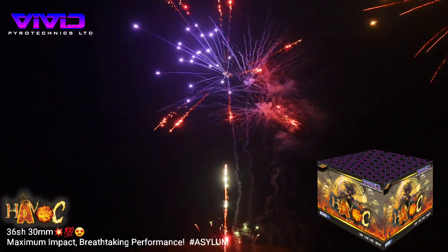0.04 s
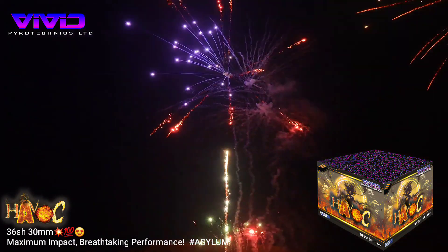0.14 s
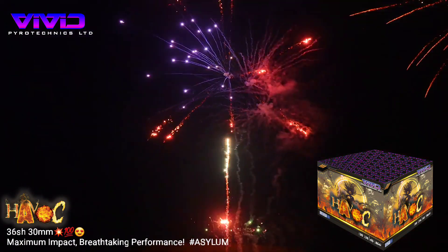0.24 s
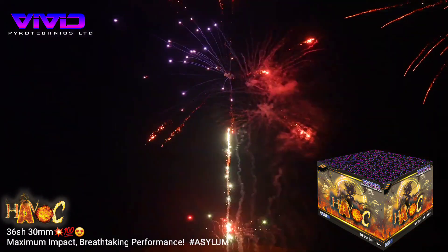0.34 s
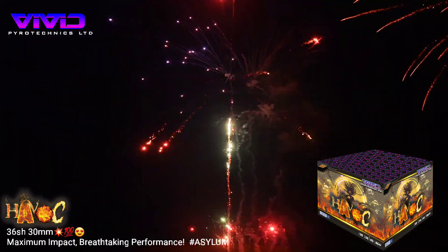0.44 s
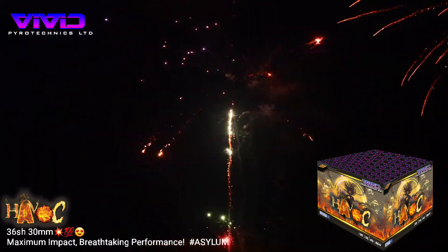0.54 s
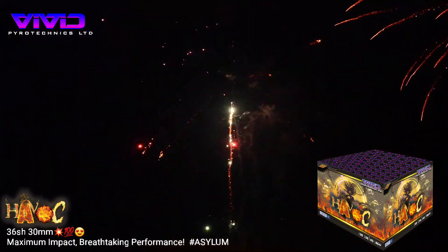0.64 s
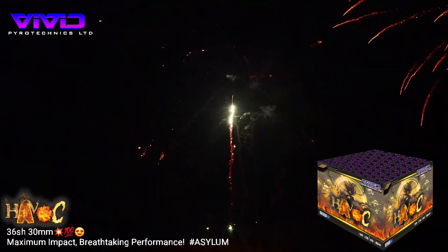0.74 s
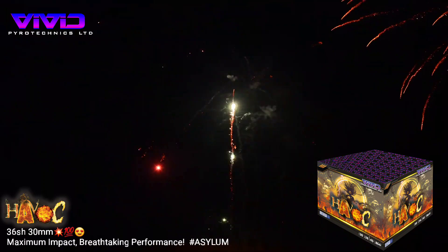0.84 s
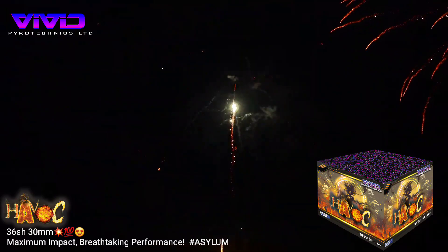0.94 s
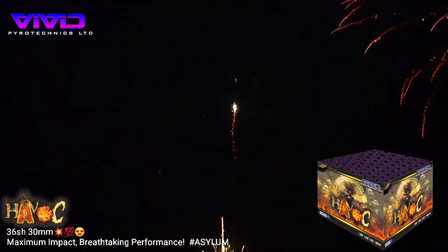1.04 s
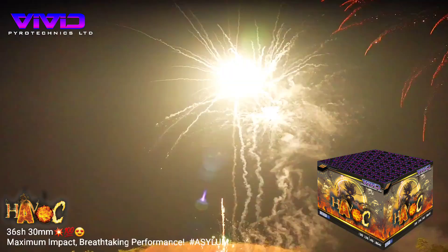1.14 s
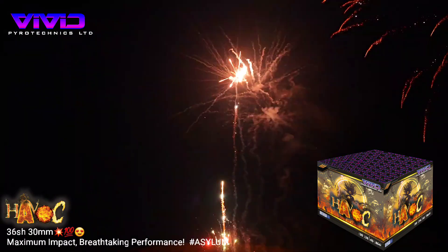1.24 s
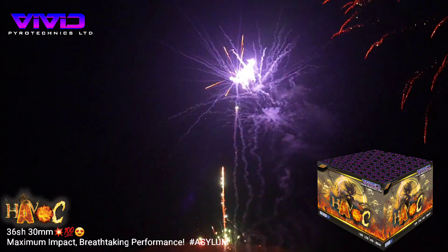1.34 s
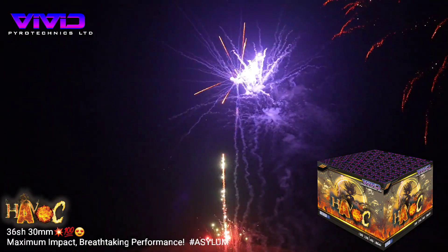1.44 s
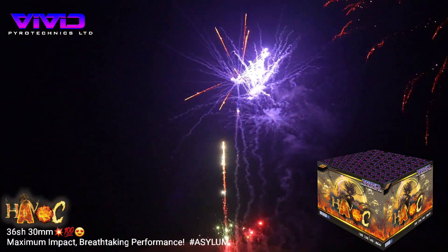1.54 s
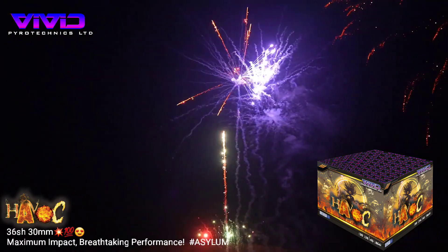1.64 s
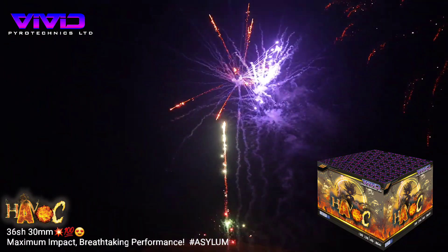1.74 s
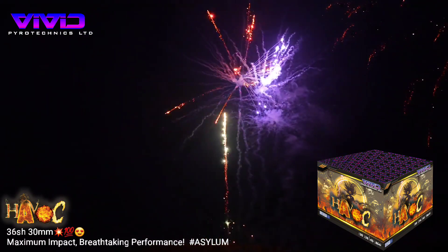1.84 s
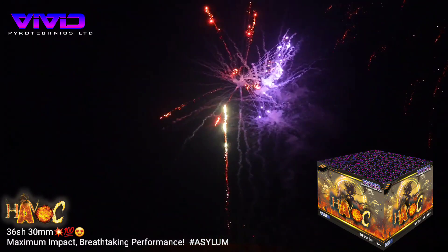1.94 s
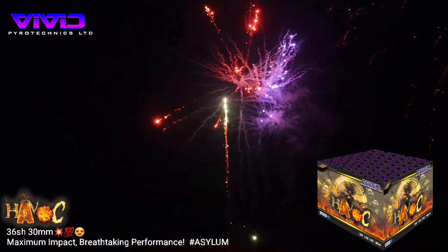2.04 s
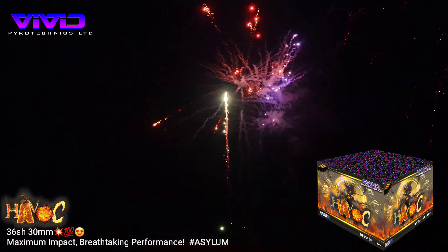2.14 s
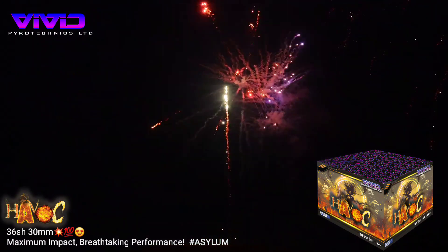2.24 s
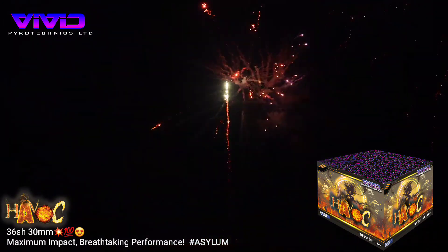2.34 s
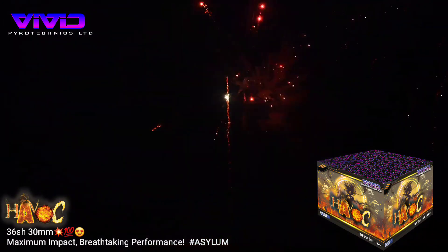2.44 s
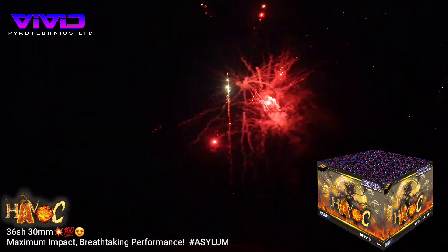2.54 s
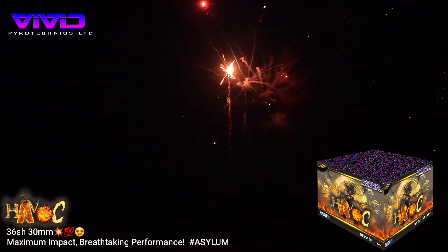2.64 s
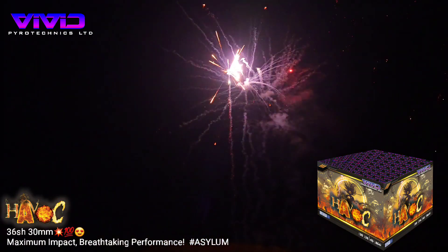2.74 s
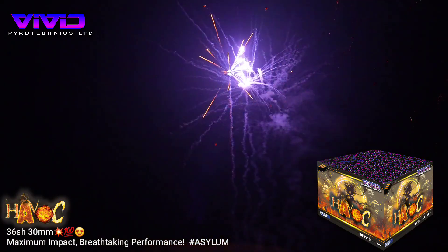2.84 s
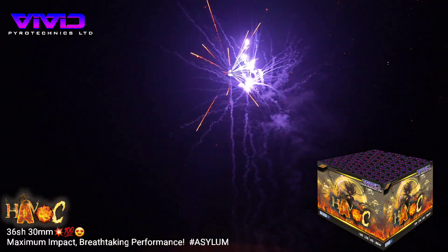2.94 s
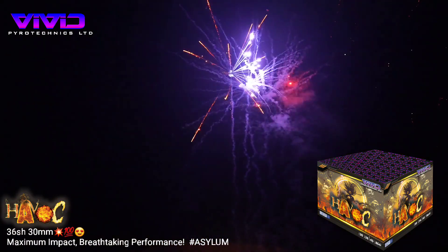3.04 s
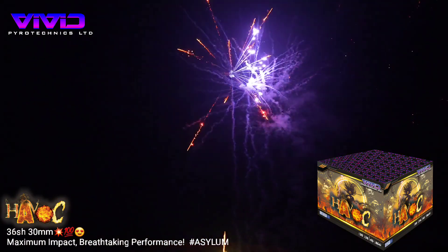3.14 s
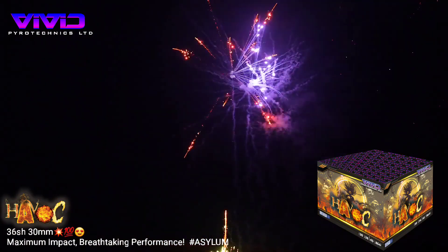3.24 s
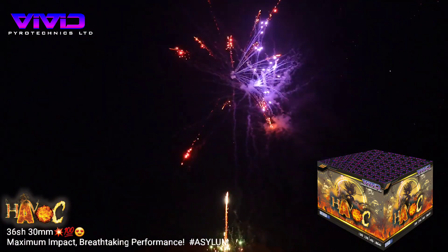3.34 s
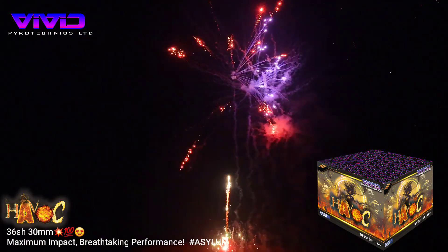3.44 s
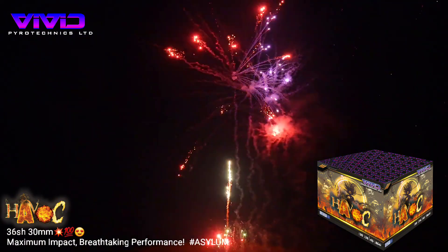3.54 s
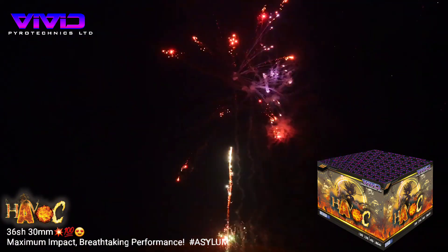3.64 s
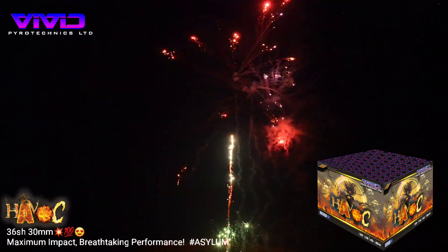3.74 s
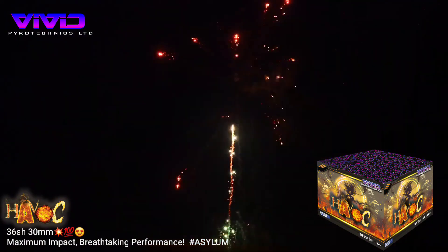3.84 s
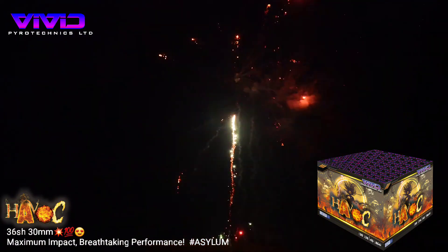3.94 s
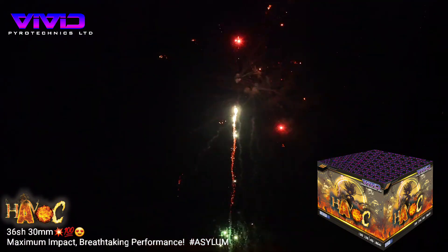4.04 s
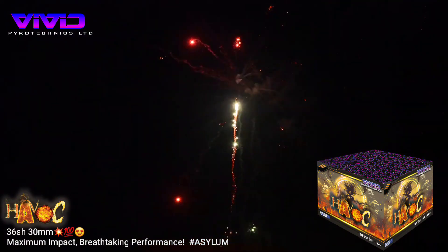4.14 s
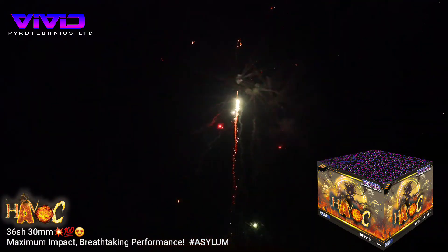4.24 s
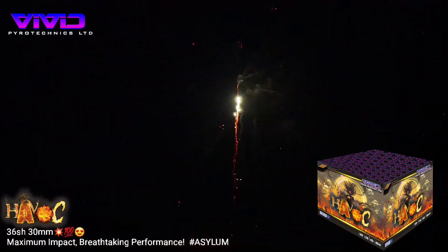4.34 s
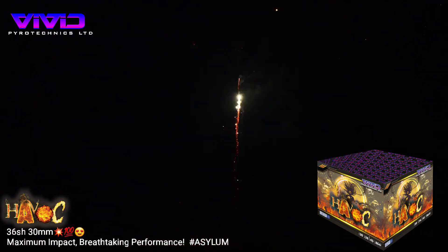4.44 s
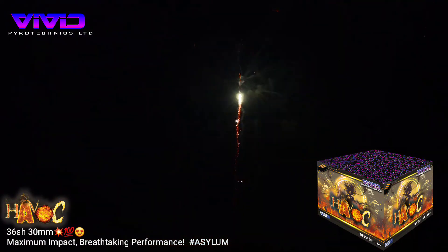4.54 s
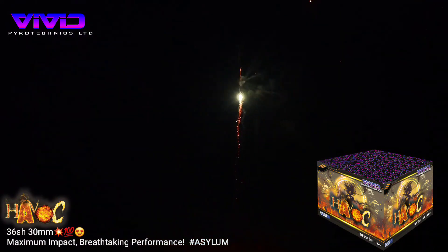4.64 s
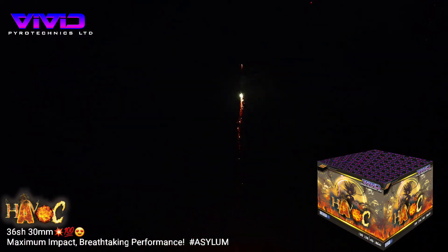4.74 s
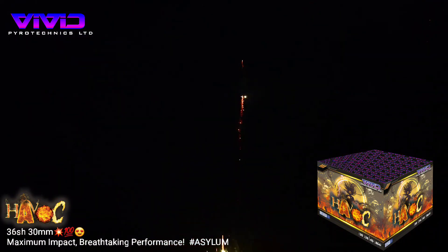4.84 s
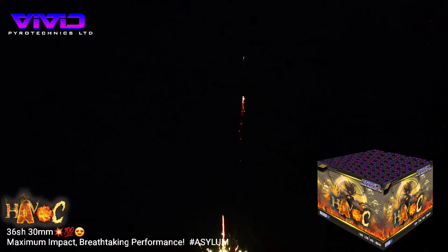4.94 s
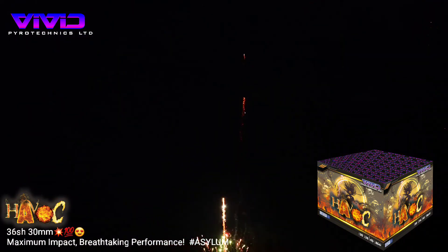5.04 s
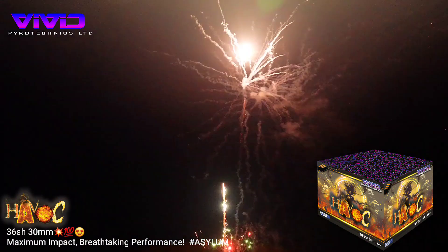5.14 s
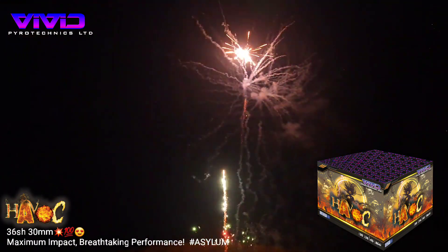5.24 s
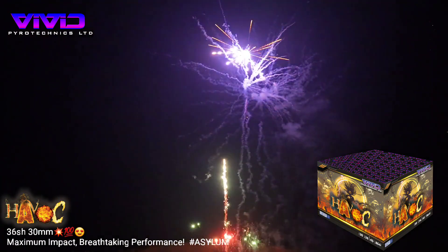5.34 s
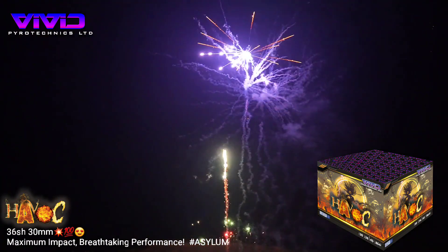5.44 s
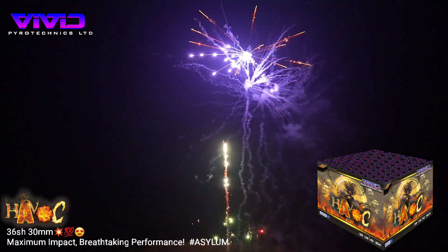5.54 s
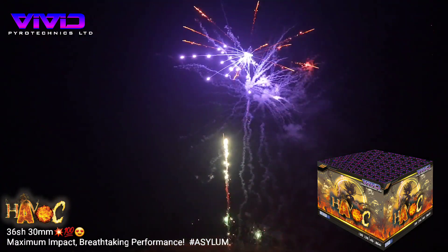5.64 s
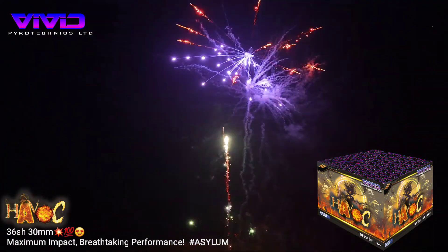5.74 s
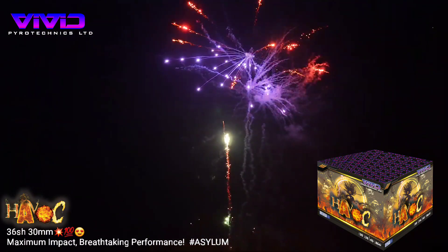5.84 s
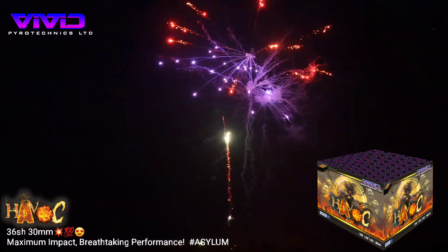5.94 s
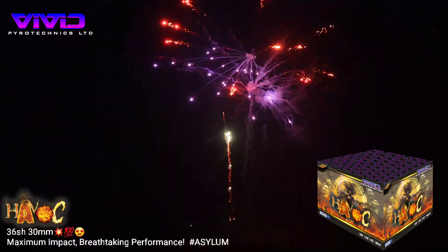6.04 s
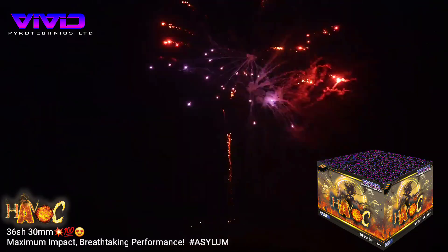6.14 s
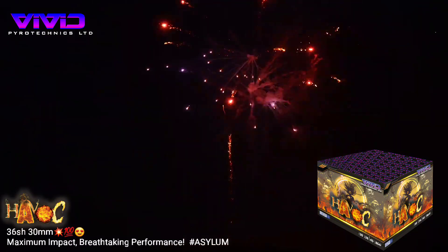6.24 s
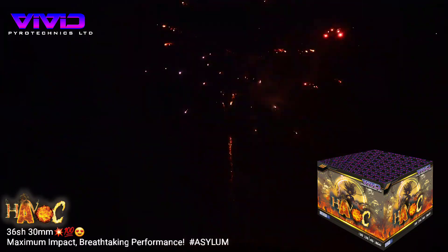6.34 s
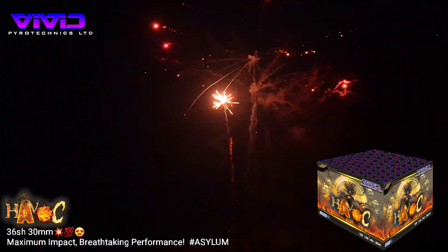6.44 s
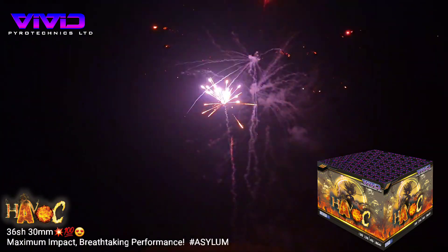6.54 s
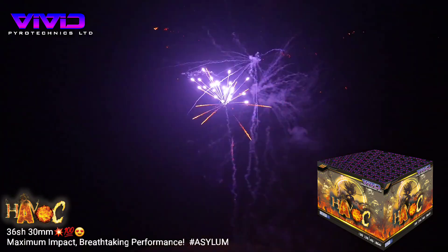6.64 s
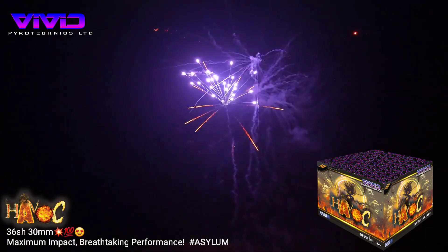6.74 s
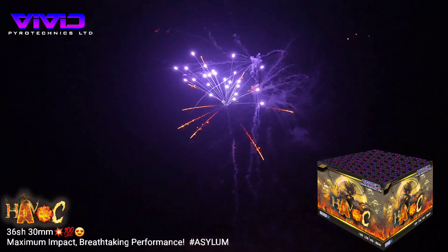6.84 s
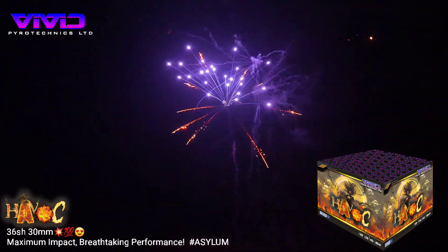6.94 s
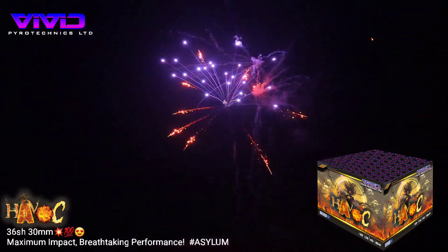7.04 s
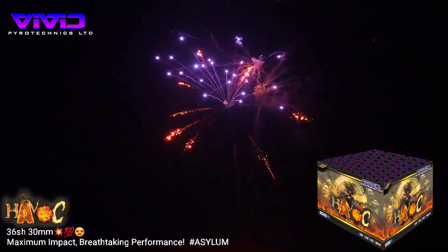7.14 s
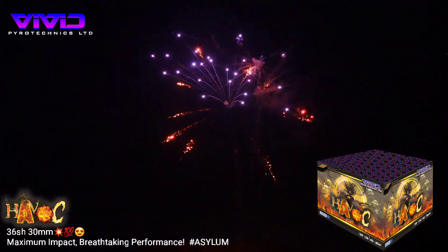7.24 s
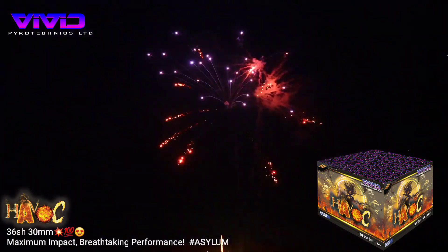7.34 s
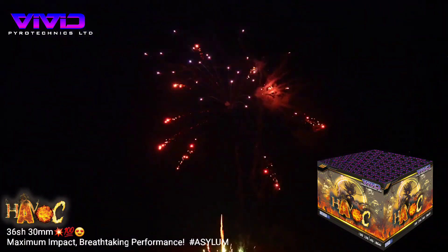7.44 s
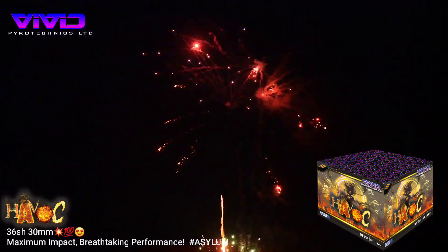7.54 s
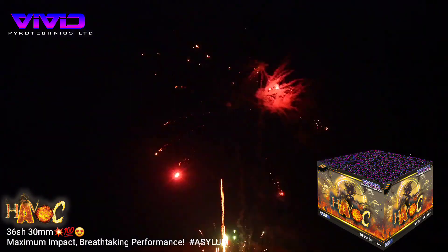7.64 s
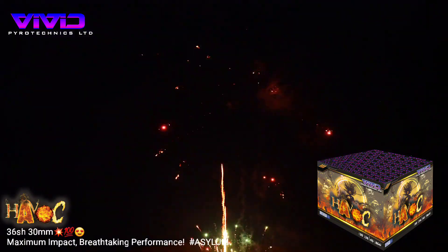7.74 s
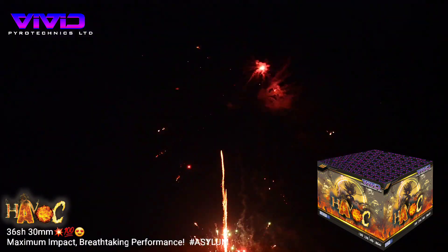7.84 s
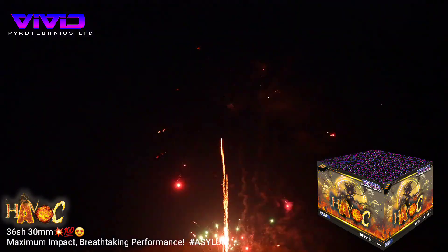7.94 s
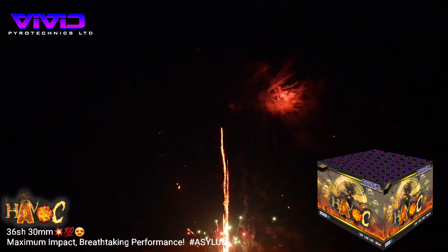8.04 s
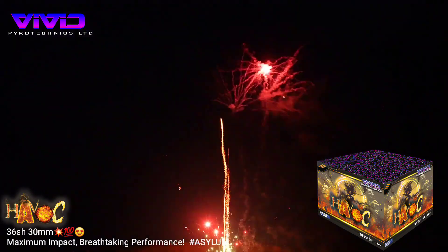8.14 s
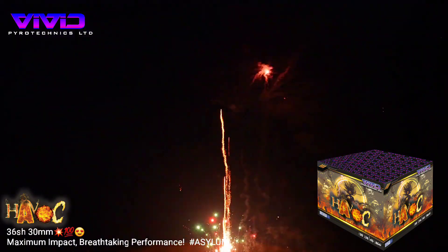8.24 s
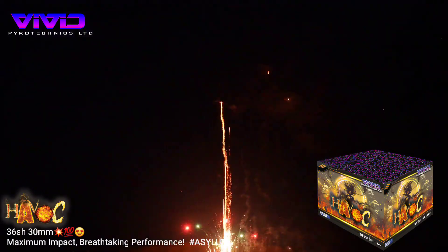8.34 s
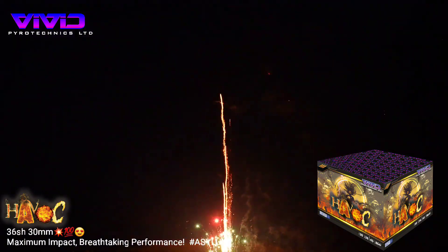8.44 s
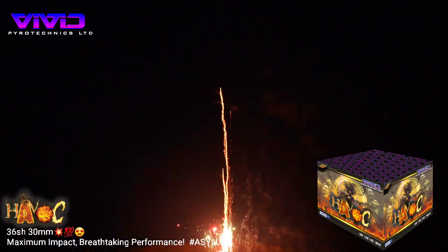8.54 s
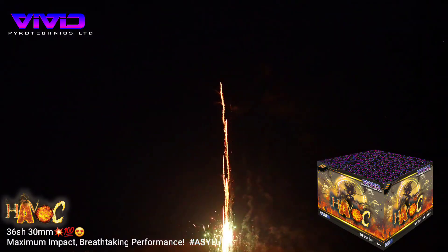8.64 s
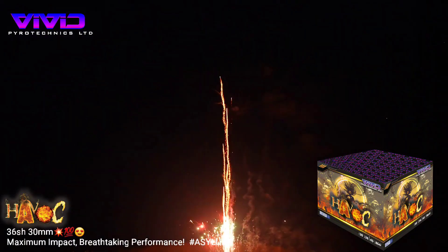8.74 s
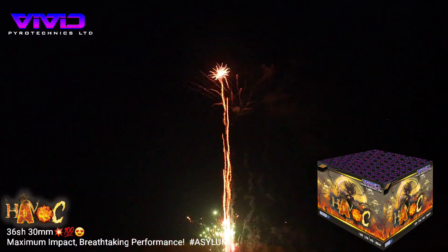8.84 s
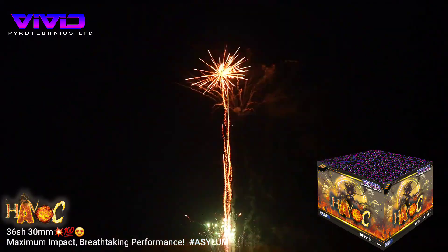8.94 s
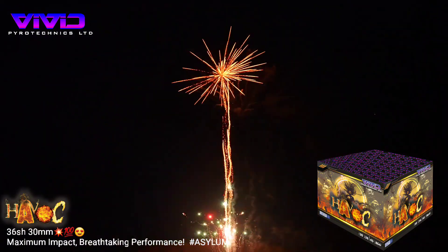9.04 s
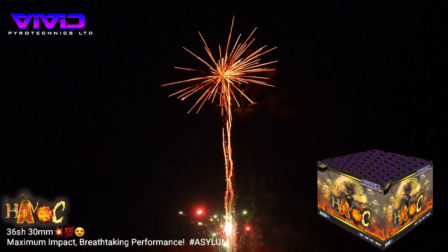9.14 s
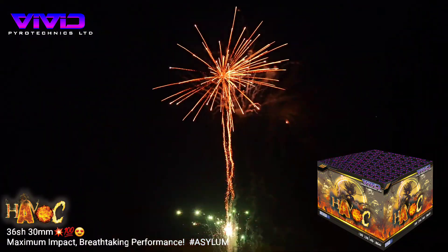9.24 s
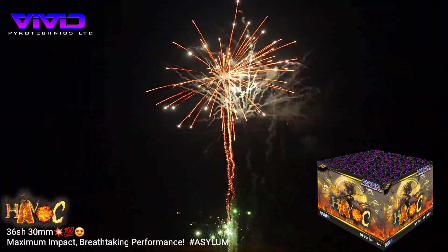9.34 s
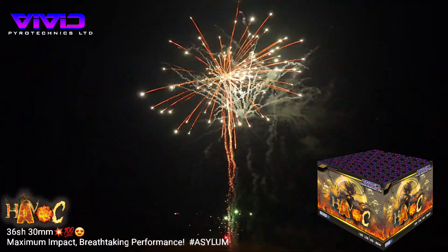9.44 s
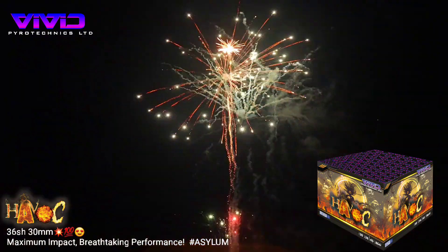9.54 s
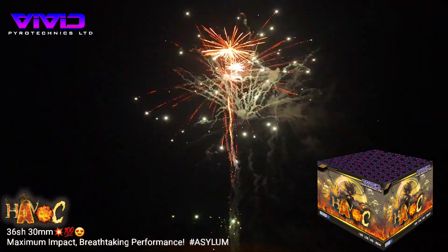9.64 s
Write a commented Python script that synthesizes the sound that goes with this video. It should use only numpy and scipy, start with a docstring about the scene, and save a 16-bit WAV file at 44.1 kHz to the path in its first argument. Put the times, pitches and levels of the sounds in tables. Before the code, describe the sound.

Echoes of an earlier burst die away, then single hollow launch thumps alternate with much louder sharp aerial bangs, with quiet gaps between them. Every bang returns as a hard slap, leafy scatter and distant rumble. Near the end launches come in a quickening volley before one more crack. Faint fizz and night hiss sit beneath; heard at a distance outdoors in wide stereo.

```python
"""Firework cake in an open field at night

Lift charges thump out of their tubes and shells burst overhead: minimum-phase shocks with close reflections.
Shaped noise returns them as a rushing scatter from the trees and a long far roll; buildings answer with
hard rattling slaps made of many shock copies. Faint dull pops, fizzes and steady night noise lie beneath."""
import sys
import numpy as np
from scipy import signal
from scipy.fft import rfft, irfft, next_fast_len
from scipy.io import wavfile

SR = 44100
rng = np.random.default_rng(int(sys.argv[2]) if len(sys.argv) > 2 else 0)


def log_audio(samples):
    """Write samples as a 16-bit WAV file to the path given in sys.argv[1]."""
    # one column per channel
    frames = np.atleast_2d(samples).T
    # limit to full scale, then quantise
    limited = np.clip(frames, -1, 1)
    pcm = np.round(limited * 32767).astype(np.int16)
    wavfile.write(sys.argv[1], SR, pcm)


N = 427329

# shell bursts: t/s, shock/dB, ground echo lag/ms, near slap lag/s, near slap length/s,
# level of near slap and rush/dB, level of roll and stray echoes/dB,
# bass of near slap, rush, roll and stray echoes/dB
BURST_SHOTS = [(-.139, 0, 4, 0.19, .098, -5, 5, 4), (1.5617, 6, 4.1, 0.17, 0.039, .5, 1, -3),
               (3.0053, 3, 4.07, 0.17, 0.038, 0, 1.5, -3), (5.548, 4, 4.6, .175, 0.038, 0, 1.5, -2),
               (6.7868, 6, 3.66, .154, .039, 1, 1, -1.5), (9.224, 5.5, 4.2, 0.17, 0.034, -0.5, 0.5, -1)]
# a shock and its reflections close to the listener: nominal lag/ms, mean level/dB, treble edge/Hz
CLOSE_PULSES = [(0, 0, 16000), (1.1, -11, 12000), (2.05, -7, 2200)]
# spectrum of a lift shock: f/Hz, relative level/dB
LIFT_COLOUR = [(30, -49), (70, -25), (130, -8), (220, 0.5), (500, -2.5), (800, -2.5), (1200, 1.5),
               (2300, -4), (3500, -11), (6000, -15), (10000, -16.5), (16000, -28)]

LIFT_DB, BURST_DB = 6.5, 1.5
SLAP_DB = 18.5  # common level of all building echoes
SHOCK_SIZE = 8192  # samples
HALF_SHOCK_S = SHOCK_SIZE / 2 / SR
BIN_HZ = np.arange(SHOCK_SIZE // 2 + 1) * SR / SHOCK_SIZE


def from_db(db):
    """Decibels to amplitude gain."""
    return 10 ** (np.asarray(db) / 20)


def at_hz(points, hz):
    """Reads a (Hz, value) table on a log-frequency axis."""
    points = np.array(points)
    return np.interp(np.log(np.maximum(hz, 1)), np.log(points[:, 0]), points[:, 1])


def add(out, s, sound):
    """Mixes a sound into out from time s on, clipped to the scene's ends."""
    start = round(s * SR)
    a, b = max(start, 0), min(start + sound.shape[-1], N)
    if b > a:
        out[:, a:b] += sound[..., a - start:b - start]


def panned(pan_db):
    """Left and right gains for a left-over-right level difference."""
    return from_db(np.array([[.5], [-.5]]) * pan_db)


def lowpassed(x, order, edge_hz):
    """Butterworth low-pass."""
    return signal.sosfilt(signal.butter(order, edge_hz, fs=SR, output="sos"), x)


def with_bass(x, db, edge_hz=220):
    """A bigger shell booms more: a low shelf."""
    return x + (from_db(db) - 1) * lowpassed(x, 1, edge_hz)


def dulled(x, edge_hz):
    """A long path through the air takes the treble away."""
    return lowpassed(x, 2, edge_hz)


def shock(colour, crack_db=0, crack_hz=3000):
    """Spectrum of a sudden-fronted pressure pulse (minimum phase); unit energy before the crack's treble shelf."""
    gain = from_db(at_hz(colour, BIN_HZ))
    gain = gain / np.sqrt(np.mean(gain ** 2))
    treble_share = BIN_HZ ** 2 / (BIN_HZ ** 2 + crack_hz ** 2)
    gain = gain * from_db(crack_db * treble_share)
    # folded real cepstrum gives minimum phase
    cepstrum = irfft(np.log(gain))[:SHOCK_SIZE // 2]
    cepstrum[1:] *= 2
    return np.exp(rfft(cepstrum, SHOCK_SIZE))


def report(pulse, arrivals):
    """A shock with its duller pulses, before or after it, skewed slightly between the ears; centred in its buffer."""
    out = 0
    for lag_ms, db, dull_hz in arrivals:
        common_ms = lag_ms * (1 + .022 * rng.normal())
        ear_ms = common_ms + .03 * np.tanh(lag_ms) * rng.normal(size=(2, 1))
        delay = np.exp(-2j * np.pi * BIN_HZ * ear_ms / 1000)
        out = out + from_db(db + rng.normal()) * delay / (1 + 1j * BIN_HZ / dull_hz)
    # all-pass: the bass lags behind the front, so a deep suction follows the first spike
    lagging = (1j * BIN_HZ - 550) / (1j * BIN_HZ + 550)
    return np.roll(irfft(out * pulse * lagging), SHOCK_SIZE // 2, axis=-1)


def slap(length_s, per_s, skew_ms=0.045, uneven_db=4):
    """Wall facets, large and small, each return a copy of the shock, weaker when later; unit energy."""
    # spectrum of a wall echo: f/Hz, relative level/dB
    wall_colour = [(30, -38.5), (70, -18), (130, -5), (260, -3.5), (520, 1.5), (750, -5), (1100, -0.5),
                   (2400, 0), (3600, -6), (6000, -12), (10000, -24.5), (16000, -40)]
    count = max(int(length_s * per_s), 2)
    place = (np.arange(count) + rng.random(count)) / count
    polarity = rng.choice([-1, 1], count)
    chance = rng.normal(size=count).clip(-2, 2)
    size = polarity * np.sqrt(1 - place ** 2) * from_db(uneven_db * chance)
    skew_s = rng.normal(0, abs(skew_ms), count) / 1000
    clicks = np.zeros((2, SHOCK_SIZE))
    for ear, sign in zip(clicks, (1, -1)):
        index = np.clip((place * length_s + sign * skew_s / 2) * SR, 0, SHOCK_SIZE - 1).astype(int)
        np.add.at(ear, index, size)
    return signal.fftconvolve(clicks / np.linalg.norm(size), irfft(shock(wall_colour))[None], axes=1)


def noise(colour, size, grain_db=0):
    """Countless tiny arrivals of uneven size, alike in both ears in the bass only; mid rms 1."""
    # stereo width: f/Hz, side over mid/dB
    side_width = [(60, -34), (110, -58.5), (200, -54), (380, -13.5), (700, -7), (1290, -3), (2380, 2),
                  (4400, 0), (8120, 0), (15000, -1)]
    hz = np.arange(size // 2 + 1) * SR / size
    grains = from_db(grain_db * np.repeat(rng.normal(size=size // 32 + 1), 32)[:size])
    mid, side = rfft(rng.normal(size=(2, size)) * grains) * from_db(at_hz(colour, hz))
    mid = irfft(mid, size)
    side = irfft(side * from_db(at_hz(side_width, hz)), size)
    return np.array([mid + side, mid - side]) / mid.std()


def scatter(gain_at, colour, grain_db, bright_s, air_db, early_db, swell_db, size):
    """Echoes of one shot from all around: early_db dulls the first off the grass, air_db (per s) the later ones."""
    age = np.arange(size) / SR
    field = rfft(noise(colour, size, grain_db))
    hz = np.linspace(0, SR / 2, field.shape[1])
    centres_hz = [500, 1500, 3000, 6000, 10000, 15000]
    # loss at the top centre; lower bands lose in proportion to frequency
    treble_loss_db = air_db * (age - bright_s) + early_db * np.clip(1 - age / bright_s, 0, 1) ** 2
    lumps = np.interp(age, np.arange(200) / 70, rng.normal(size=200))
    out = 0
    for centre, share in zip(centres_hz, np.eye(len(centres_hz))):
        # big reflectors come in lumps and return the low notes; leaves return an even hiss
        lump_db = swell_db * lumps * min(1, centres_hz[1] / centre)
        db = lump_db - treble_loss_db * centre / centres_hz[-1]
        out = out + irfft(field * np.interp(hz, centres_hz, share)) * from_db(db)
    return out * gain_at(age)


def belt(age, db, near_s, far_s, rise_db_per_s, thin_db_per_s, fade_db_per_s, near_pan_db, far_pan_db):
    """Stereo echo gain of a belt of country: builds to its near edge, thins across it, dies past its far edge."""
    inside = np.clip(age, near_s, far_s)
    rise_db = rise_db_per_s * np.maximum(near_s - age, 0)
    thin_db = thin_db_per_s * (inside - near_s)
    fade_db = fade_db_per_s * np.maximum(age - far_s, 0)
    pan_db = np.interp(age, [near_s, far_s], [near_pan_db, far_pan_db])
    return from_db(db - (rise_db + thin_db + fade_db)) * panned(pan_db)


def close_by(age, db, fade_db_per_s, pan_db):
    """Stereo gain of the brief splash off the ground around the listener."""
    return from_db(db - fade_db_per_s * age) * panned(pan_db)


def smeared_echo(lag_s, spread_s, hz, width_hz, size):
    """One band of a shot, smeared by foliage into a soft swell; noise of rms 1 under a Gaussian of peak 1."""
    edges = hz * np.exp(np.array([-.5, .5]) * width_hz / hz)
    band = signal.sosfilt(signal.butter(2, edges, "band", fs=SR, output="sos"), rng.normal(size=size))
    swell = np.exp(-.5 * ((np.arange(size) / SR - lag_s) / spread_s) ** 2)
    return band / band.std() * swell


def lifts():
    """Each lift charge leaves its tube as a hollow knock; all start from one spot, so their echoes are half alike."""
    # lift charges: t/s, shock/dB, crack/dB, bass/dB, ring of the tube f/Hz, scatter/dB
    lift_shots = [(1.051, 0, -5.5, 1.5, 1080, 0.5), (3.224, 0.5, -4, 1, 1070, -3),
                  (4.9403, -0.5, -10.5, -4, 1080, -1.5), (7.4457, 0, 5, 4, 1000, 2),
                  (7.6925, 0, 4.5, 4, 1040, -0.5), (8.0316, 2, -3.5, -2.5, 1100, -1),
                  (8.2532, 1.5, 0, 0, 1370, -1), (8.434, 0, 5, 1.5, 1460, -.5),
                  (8.6294, 0, 2, -1, 1410, -0.5)]
    # pulses that make up one lift: nominal lag/ms, mean level/dB, treble edge/Hz
    knock_pulses = [(-3.0, -18, 1200), (0, 0, 16000), (.84, -10, 2500), (1.72, -5, 2200), (2.82, -12, 1800),
                    (3.58, -7.5, 1600)]
    ring_db, ring_q = -4.5, 5  # the mortar tube's ring
    out, common = np.zeros((2, N)), lift_echoes()
    for s, db, crack_db, bass_db, ring_hz, scatter_db in lift_shots:
        knock = report(shock(LIFT_COLOUR, crack_db), knock_pulses)
        ring = signal.lfilter(*signal.iirpeak(ring_hz, ring_q, fs=SR), knock)
        knock = knock + from_db(ring_db) * ring
        add(out, s - HALF_SHOCK_S, from_db(LIFT_DB + db) * with_bass(knock, bass_db))
        echoes = (common + lift_echoes()) / np.sqrt(2)
        add(out, s, from_db(scatter_db) * with_bass(echoes, bass_db))
    return out


def lift_echoes(size=49152):
    """The field's answer: a wash from trees, the knock's notes from hedges, a brighter swell from treetops."""
    # spectrum of the wash: f/Hz, relative level/dB
    wash_colour = [(24, -63.5), (40, -34.5), (185, -12.5), (262, -10.5), (412, -17), (444, -10),
                   (503, -7.5), (585, -8.5), (1020, -6), (1440, -8), (1550, -11), (5870, -14),
                   (9940, -19.5), (14500, -29), (16000, -44)]
    # hedges that answer every lift: lag/s, level/dB
    hedges = [(0.032, -33), (0.055, -34.5), (.085, -44.5), (.116, -36.5)]
    # notes of the knock that the hedges return: f/Hz, width/Hz, level/dB, loss/(dB per s of lag)
    knock_notes = [(536, 240, 3.5, 119), (1180, 480, -1, 0)]
    hedge_spread, hedge_pan_db = 0.15, 3  # smear as a share of the lag; left over right
    out = scatter(lift_gain, wash_colour, grain_db=1.5, bright_s=0.058, air_db=27.5, early_db=59,
                  swell_db=1.5, size=size)
    for lag_s, db in hedges:
        for hz, width_hz, note_db, loss_db_per_s in knock_notes:
            echo = smeared_echo(lag_s, hedge_spread * lag_s, hz, width_hz, size)
            out = out + from_db(db + note_db - loss_db_per_s * lag_s) * panned(hedge_pan_db) * echo
    treetops = smeared_echo(lag_s=0.17, spread_s=0.032, hz=2030, width_hz=1320, size=size)
    return out + from_db(-37.5) * panned(pan_db=-2.5) * treetops


def lift_gain(age):
    """A lift splashes off the ground, sweeps through the trees and returns faintly from the country beyond."""
    trees = belt(age, db=-34.0, near_s=0.075, far_s=0.2, rise_db_per_s=110, thin_db_per_s=47.5,
                 fade_db_per_s=88, near_pan_db=1, far_pan_db=-1.0)
    country = belt(age, db=-52.5, near_s=0.6, far_s=0.59, rise_db_per_s=38, thin_db_per_s=9,
                   fade_db_per_s=40, near_pan_db=-2, far_pan_db=-2)
    splash = close_by(age, db=-29, fade_db_per_s=999, pan_db=-9)
    return np.hypot(np.hypot(trees, country), splash)


def bursts(ground_db=-5, ground_hz=7000, facets_per_s=5000):
    """Each shell cracks overhead, bounces off the ground, then slaps back from near and far buildings."""
    # spectrum of a burst shock: f/Hz, relative level/dB
    burst_colour = [(30, -42.5), (70, -29.5), (130, -6.5), (260, 1.5), (500, 2), (1000, 4), (2000, -2),
                    (3300, -9), (6000, -9.5), (10000, -15.5), (16000, -23)]
    # other echoes of every burst, one very close, then far ones: lag/s, length/s, level/dB, facet rate/(1/s)
    other_slaps = [(.037, .014, -15, 1000), (0.521, .07, -24, 200), (0.562, 0.016, -19.5, 600),
                   (.62, 0.021, -27, 240), (0.774, .014, -22.5, 600), (0.893, 0.064, -33, 120)]
    near_slap_db = -4.5
    late_edge_hz = 790  # treble edge of an echo one second late; falls with the root of the lag
    out = np.zeros((2, N))
    for s, db, ground_ms, slap_lag_s, slap_length_s, near_db, _, bass_db in BURST_SHOTS:
        arrivals = [*CLOSE_PULSES, (ground_ms, ground_db, ground_hz)]
        crack = report(shock(burst_colour), arrivals)
        add(out, s - HALF_SHOCK_S, from_db(BURST_DB + db) * crack)
        near_slap = with_bass(slap(slap_length_s, facets_per_s), bass_db)
        add(out, s + slap_lag_s, from_db(SLAP_DB + near_slap_db + near_db) * near_slap)
        for lag_s, length_s, echo_db, per_s in other_slaps:
            echo = dulled(slap(length_s, per_s, skew_ms=.15), late_edge_hz / np.sqrt(lag_s))
            add(out, s + lag_s, from_db(SLAP_DB + echo_db) * echo)
    return out


def burst_tails():
    """The bright rush from the trees, and the low roll from the country beyond, first in the right ear."""
    # spectra of the rush and of the roll: f/Hz, relative level/dB
    rush_colour = [(24, -62), (40, -31), (87, -15), (155, -9.5), (243, -4), (276, -6.5), (479, -3),
                   (556, 2.5), (751, -6.5), (1040, 0.5), (3380, -8.5), (5580, -7), (8340, -9), (14800, -17),
                   (16000, -37)]
    roll_colour = [(24, -54.5), (40, -30.5), (85, -12.5), (124, -14), (194, -2), (297, -0.5), (402, -5),
                   (630, -1.5), (1590, -3.5), (2150, -6.5), (2770, -15), (4460, -12), (6490, -12.5),
                   (13800, -29.5), (16000, -61)]
    out = np.zeros((2, N))
    for s, *_, near_db, roll_db, bass_db in BURST_SHOTS:
        rush = scatter(rush_gain, rush_colour, grain_db=1, bright_s=0.097, air_db=54.5, early_db=22,
                       swell_db=1, size=49152)
        roll = scatter(roll_gain, roll_colour, grain_db=1.0, bright_s=0.48, air_db=20.5, early_db=-1.5,
                       swell_db=2.04, size=81920)
        roll[0] = np.roll(roll[0], 6)  # left ear late by 6 samples
        add(out, s, from_db(near_db) * with_bass(rush, bass_db))
        add(out, s, from_db(roll_db) * with_bass(roll, bass_db))
    return out


def rush_gain(age):
    """A burst splashes off the ground, then sweeps through the trees from left to right."""
    trees = belt(age, db=-21, near_s=0.051, far_s=0.31, rise_db_per_s=471, thin_db_per_s=48.5,
                 fade_db_per_s=168, near_pan_db=1.0, far_pan_db=-1.5)
    return np.hypot(trees, close_by(age, db=-25.0, fade_db_per_s=848.5, pan_db=3))


def roll_gain(age):
    """The country beyond the trees keeps a burst rolling for about a second."""
    return belt(age, db=-44.5, near_s=0.22, far_s=0.87, rise_db_per_s=194, thin_db_per_s=1.5,
                fade_db_per_s=26, near_pan_db=-1, far_pan_db=-2.0)


def stray_echoes(level_db=-31, fall_db_per_s=10, uneven_db=2.5, count=9):
    """Single far roofs and walls put small crackling lumps into the roll of each burst."""
    out = np.zeros((2, N))
    for s, *_, roll_db, bass_db in BURST_SHOTS:
        for lag_s, chance in zip(rng.uniform(.28, 0.96, count), rng.normal(size=count)):
            db = SLAP_DB + level_db + roll_db + uneven_db * chance - fall_db_per_s * (lag_s - .5)
            lump = dulled(slap(.012, 400, skew_ms=0.4), edge_hz=1200)
            add(out, s + lag_s, from_db(db) * with_bass(lump, bass_db))
    return out


def small_sounds():
    """Treble-poor shocks as echoes of the opening burst and faint dull pops; swelling noise as burning-star fizz."""
    # low boom of the opening burst's near slap, then its far slap; later rows are faint dull pops:
    # t/s, level re lift/dB, bass/dB
    dull_shocks = [(.042, -18, 22.5), (.061, -15, 16), (.427, -8, 5), (5.523, -15, -13), (9.0173, -16, -12)]
    # fizzes: centre t/s, Gaussian sigma/s, level/dB
    fizzes = [(.853, 0.0089, -54), (4.074, 0.22, -59), (4.41, .033, -71)]
    # spectrum of a fizz: f/Hz, relative level/dB
    fizz_colour = [(1000, -23), (2500, 6.5), (5000, 0), (10000, -2), (16000, -15)]
    time_s = np.arange(N) / SR
    fizzing = sum(from_db(db) * np.exp(-.5 * ((time_s - s) / sigma_s) ** 2) for s, sigma_s, db in fizzes)
    out = fizzing * noise(fizz_colour, next_fast_len(N), grain_db=2.5)[:, :N]
    for s, db, bass_db in dull_shocks:
        dull_shock = report(shock(LIFT_COLOUR, crack_db=-23.0), CLOSE_PULSES)
        add(out, s - HALF_SHOCK_S, from_db(LIFT_DB + db) * with_bass(dull_shock, bass_db))
    return out


def night(level_db=-62):
    """Steady faint background of the night: coloured stereo noise."""
    # spectrum of the background: f/Hz, relative level/dB
    night_colour = [(30, -33.5), (80, -22.5), (200, -21), (380, -16), (540, 5), (750, -12.5), (1100, 1.5),
                    (1900, -7), (3200, -13), (6000, -30.5), (10000, -27), (16000, -38)]
    return from_db(level_db) * noise(night_colour, next_fast_len(N))[:, :N]


def scene():
    """Sum of all layers."""
    return lifts() + bursts() + burst_tails() + stray_echoes() + small_sounds() + night()


def record(dry):
    """The shock fronts overload the microphone, sooner on the push than on the suction; the top is cut."""
    ceiling = np.where(dry > 0, .5, .95)
    limited = dry / (1 + (dry / ceiling) ** 4) ** (1 / 4)
    cutoff_hz = 15800
    return signal.sosfilt(signal.ellip(10, .1, 80, cutoff_hz, fs=SR, output="sos"), limited)


dry = scene()
out = record(dry)
log_audio(out)
```